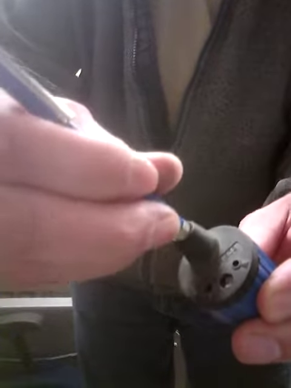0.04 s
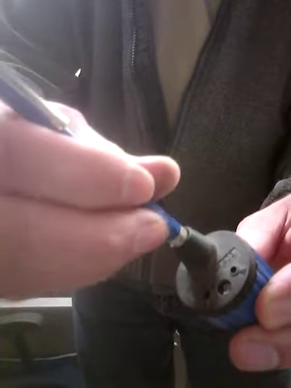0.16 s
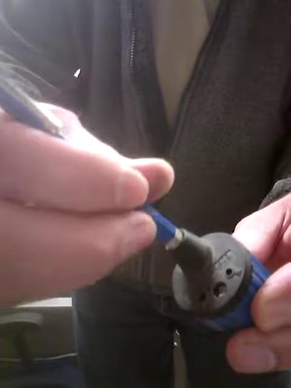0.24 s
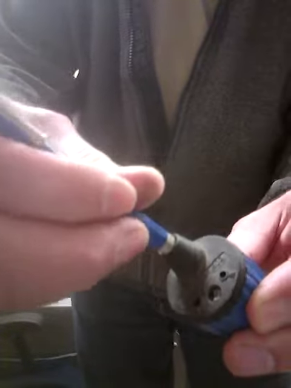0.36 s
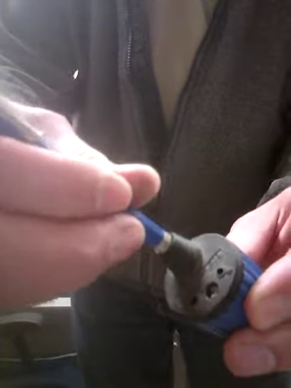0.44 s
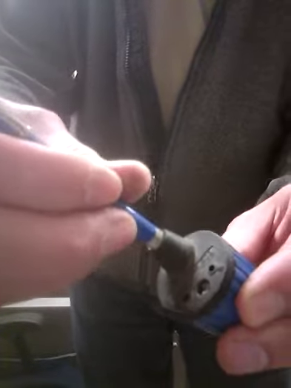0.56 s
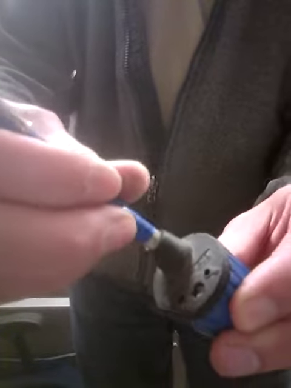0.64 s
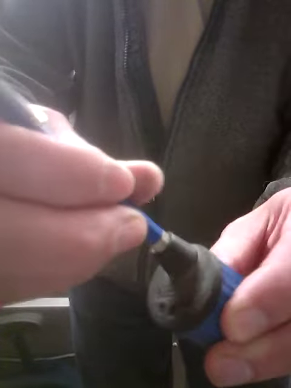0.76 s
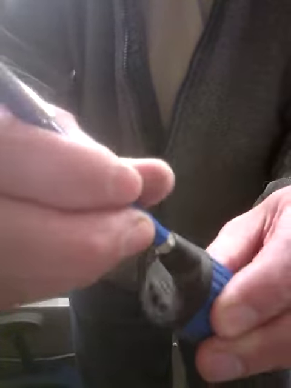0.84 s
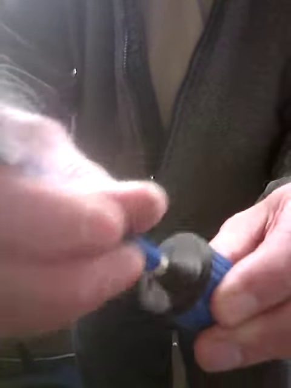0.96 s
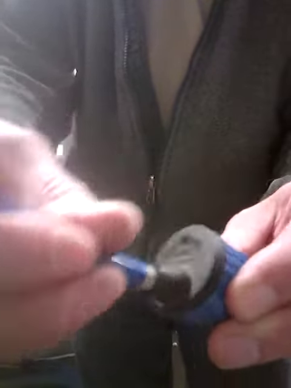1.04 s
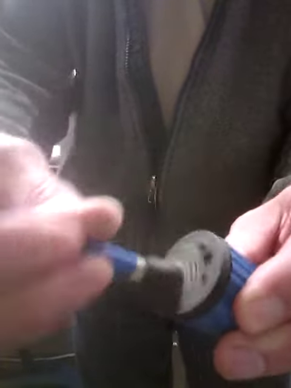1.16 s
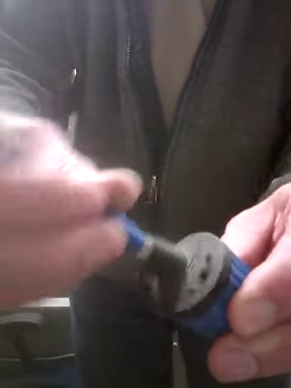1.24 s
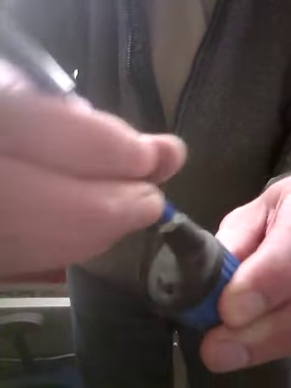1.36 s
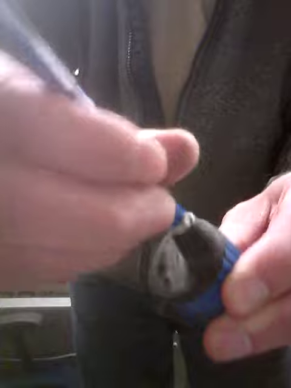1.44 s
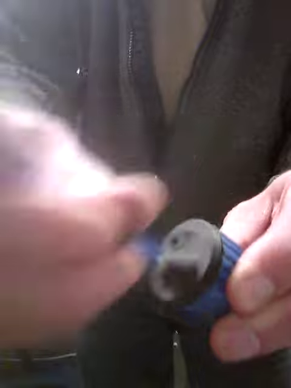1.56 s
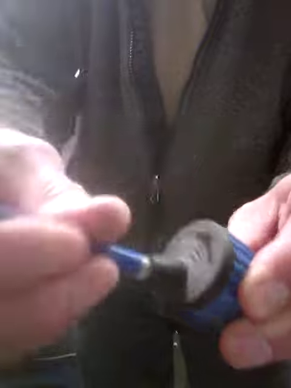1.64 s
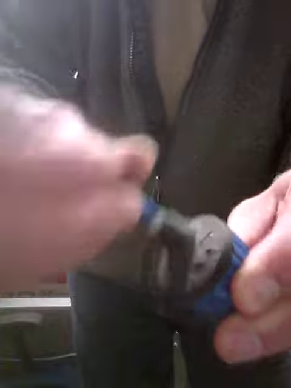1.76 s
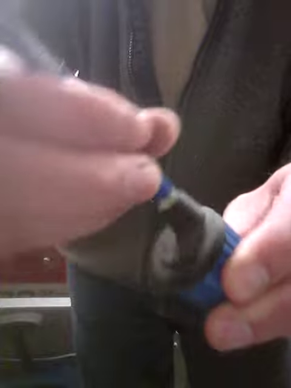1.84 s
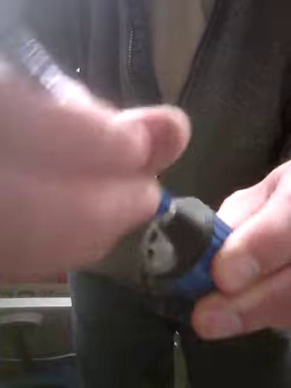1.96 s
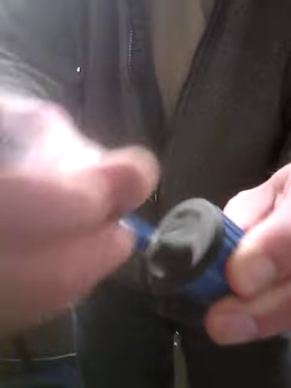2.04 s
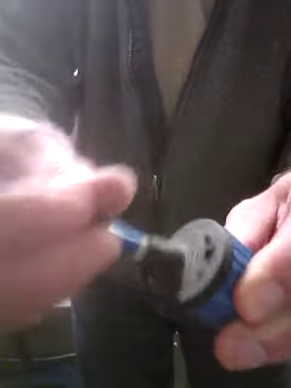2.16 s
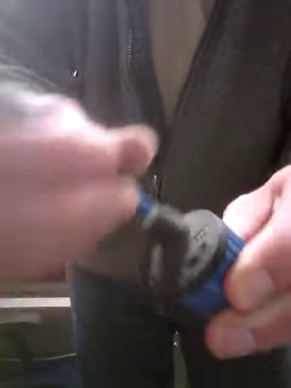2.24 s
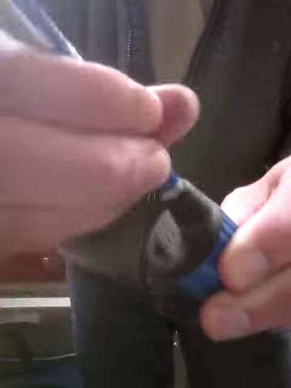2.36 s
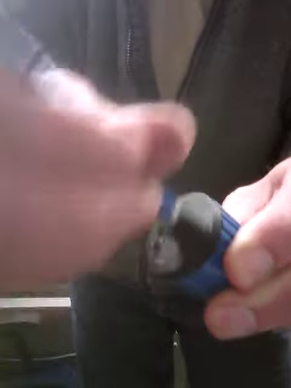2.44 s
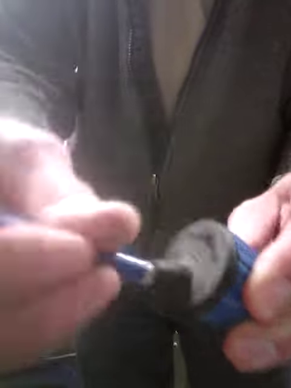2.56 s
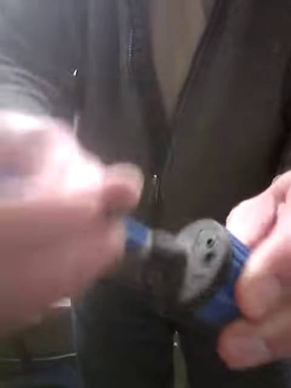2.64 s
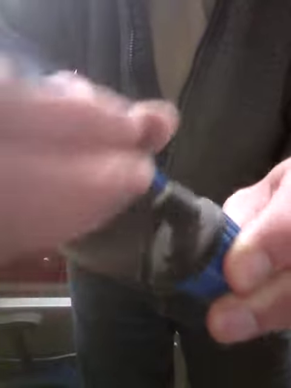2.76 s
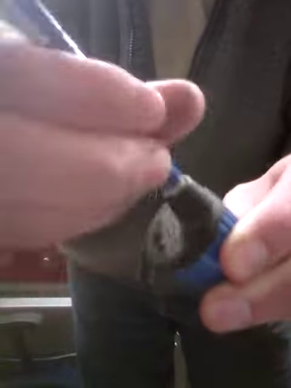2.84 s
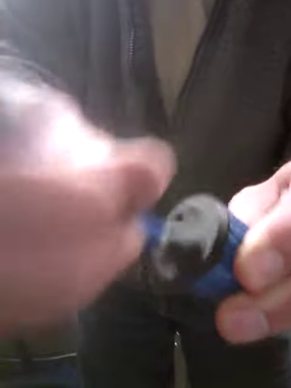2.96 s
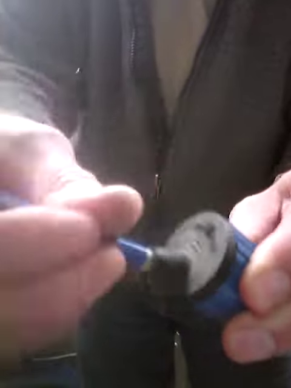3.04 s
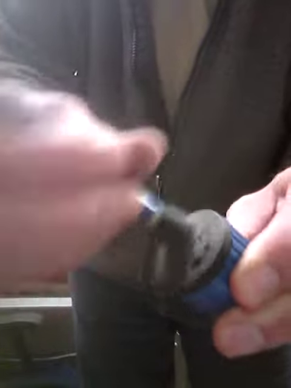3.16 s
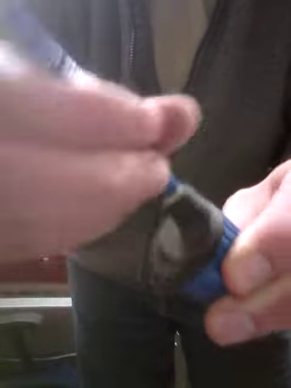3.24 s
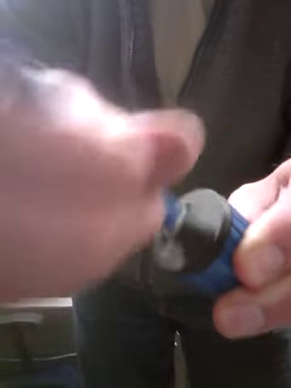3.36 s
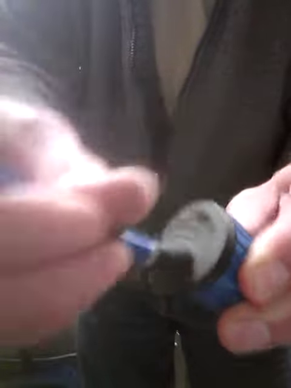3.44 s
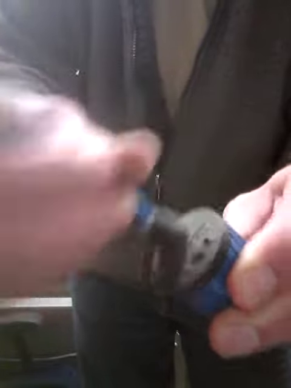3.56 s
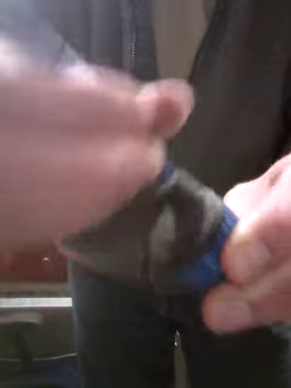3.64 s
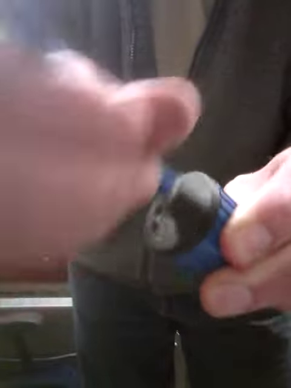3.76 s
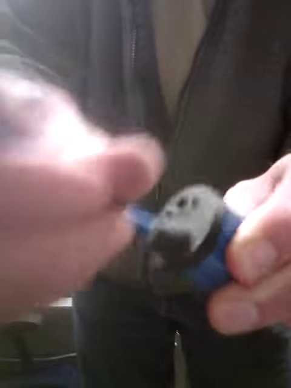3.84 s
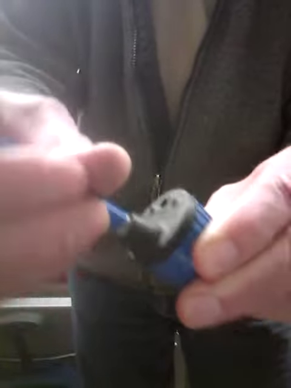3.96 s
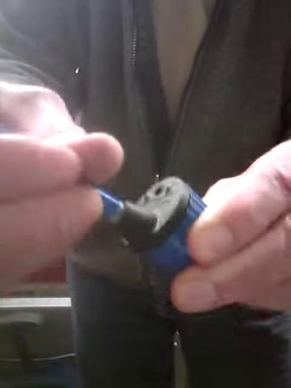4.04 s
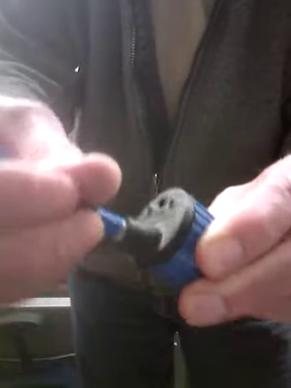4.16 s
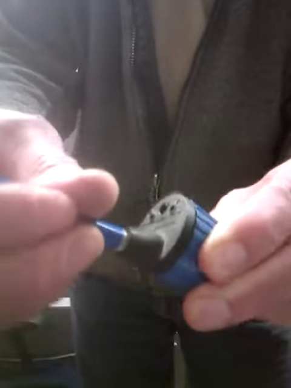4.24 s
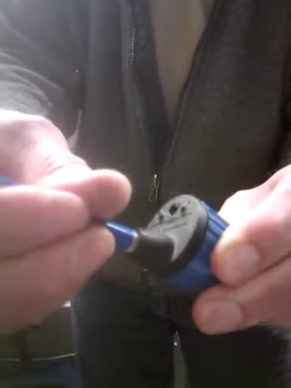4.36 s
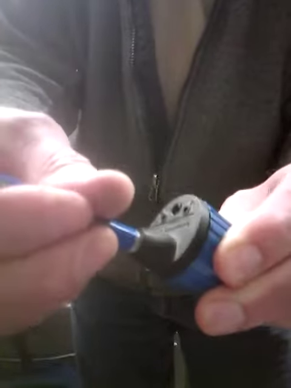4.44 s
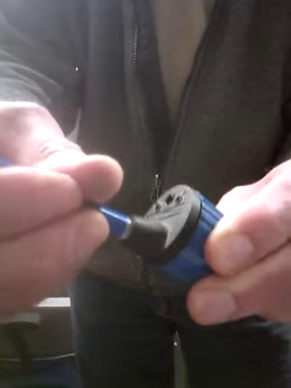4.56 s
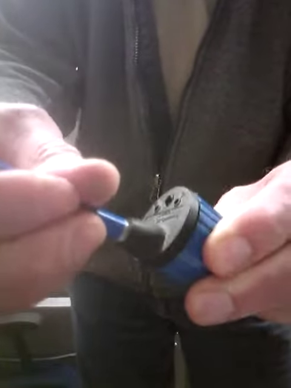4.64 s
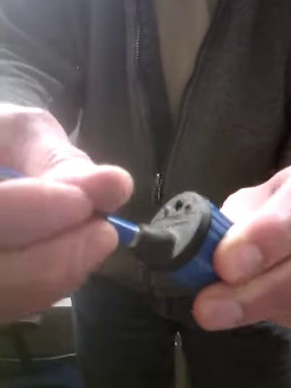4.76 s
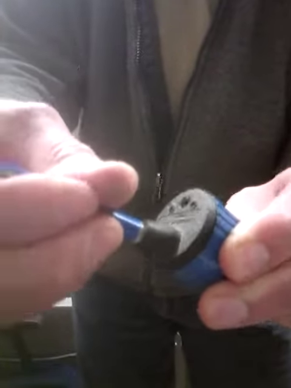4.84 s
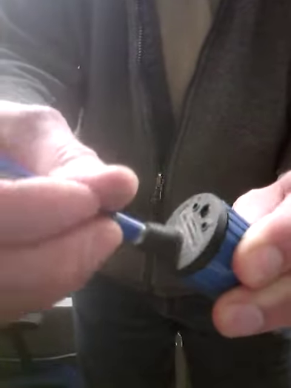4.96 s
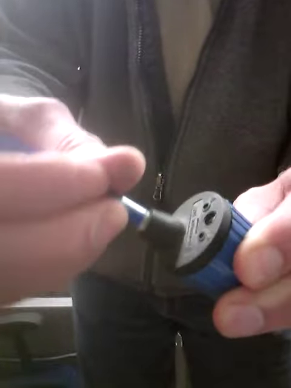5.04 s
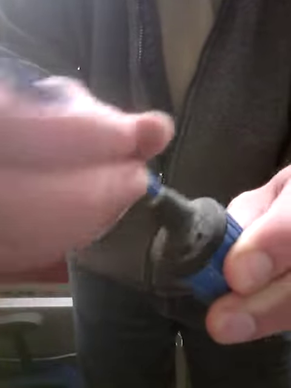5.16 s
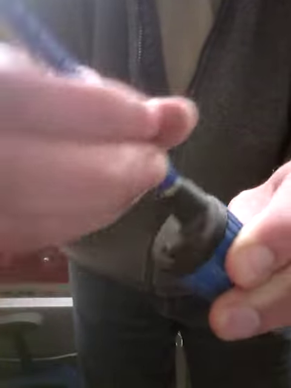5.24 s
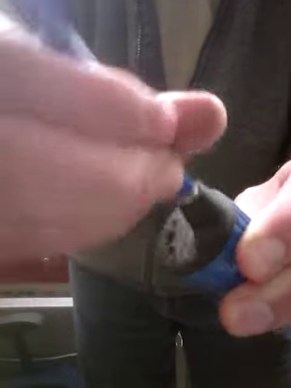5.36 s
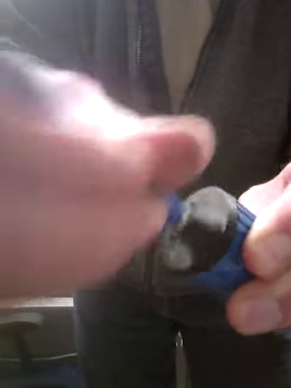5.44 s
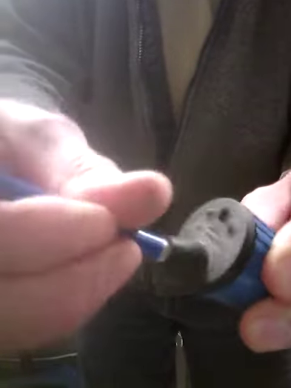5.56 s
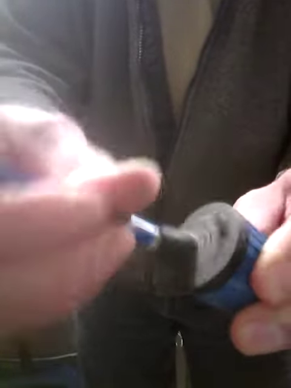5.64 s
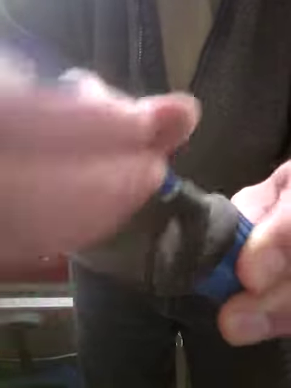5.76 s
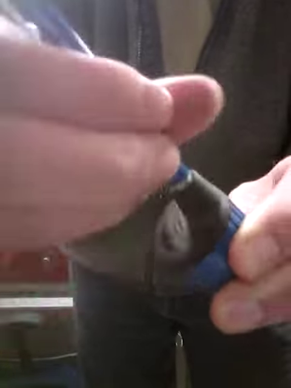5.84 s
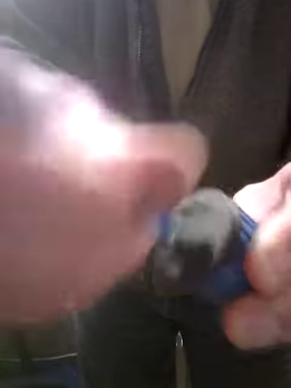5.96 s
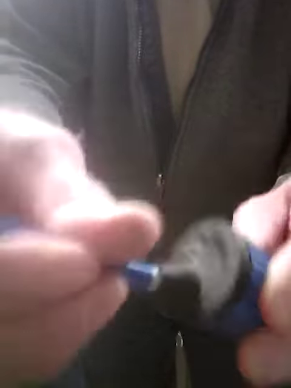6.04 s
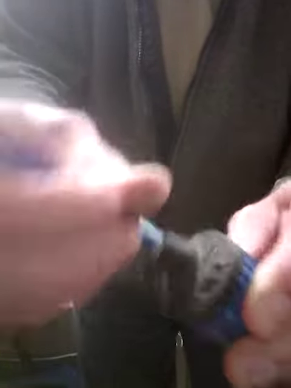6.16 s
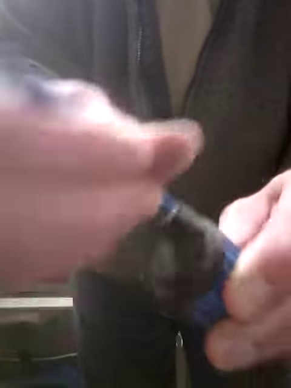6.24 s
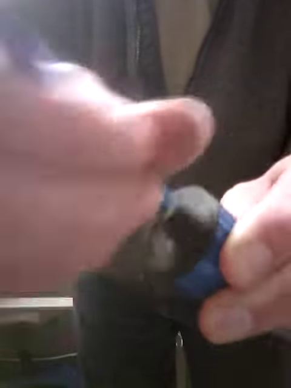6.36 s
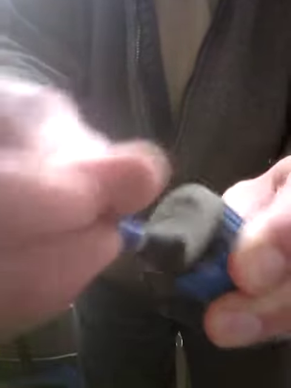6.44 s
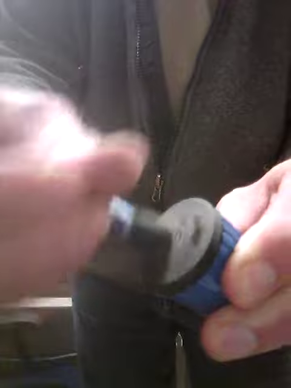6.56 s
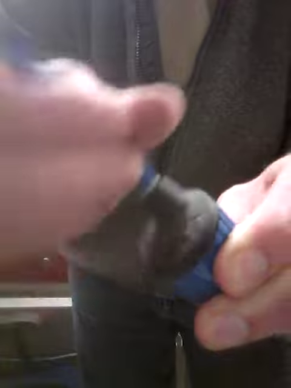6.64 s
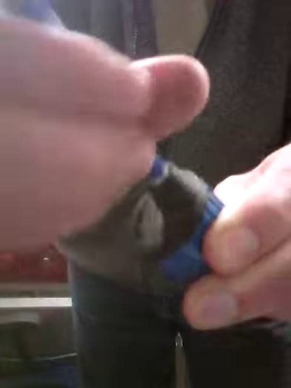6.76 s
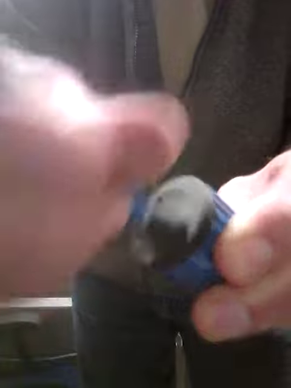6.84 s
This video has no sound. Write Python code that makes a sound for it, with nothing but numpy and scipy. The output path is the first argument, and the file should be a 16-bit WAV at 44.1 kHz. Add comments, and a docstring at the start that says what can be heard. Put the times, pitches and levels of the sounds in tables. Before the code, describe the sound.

A pencil lead is swung round in a plastic rotary pointer, rasping, chattering and half squeaking in two spells, with faint clicks between, in a quiet room

```python
"""In a small, quiet room a lead holder is swung round in a hand-held rotary lead pointer, close by, in two spells.
Stick-slip friction of the lead on the abrasive cup is made of random grains in uneven slips, and a resonant
filter lets the plastic pot ring with them; the cap rumbles. Sliding narrow noise makes half squeaks of the rubbing
parts, and one faint chirping tick in the pause. The holder ticks before, between and once during the spells, as
short bursts of grains. Filtered noise makes room air and a faint whine; sines make a rising hum and a swelling drone."""
import sys
import numpy as np
from scipy import signal
from scipy.fft import rfft, irfft, next_fast_len
from scipy.io import wavfile
from scipy.ndimage import uniform_filter1d, map_coordinates

SR = 44100
rng = np.random.default_rng(int(sys.argv[2]) if len(sys.argv) > 2 else 0)


def transcribe(u):
    """Save the signal u as a 16-bit wav file named by the first command-line argument.

    u: samples, shape (n,) or (channels, n), limited to [-1, 1]; the rate is SR.
    q: integer samples, one column per channel.
    """
    v = np.clip(np.atleast_2d(u).T, -1, 1)
    q = np.round(v * 32767).astype(np.int16)
    wavfile.write(sys.argv[1], SR, q)


N = 304290


def amp(db):
    """Level law: decibels to amplitude gain."""
    return 10 ** (np.asarray(db) / 20)


def unit(x):
    """Normalisation: x scaled to rms 1."""
    return x / np.sqrt(np.mean(x ** 2) + 1e-20)


def along(points, hz):
    """Logarithmic frequency scale: (frequency, value) points interpolated on it."""
    f, v = np.transpose(points)
    return np.interp(np.log(hz + 1), np.log(f + 1), v)


def curves(rows):
    """Linear interpolation in time: one value per sample for each column after the time."""
    s, *cols = np.transpose(rows)
    return [np.interp(np.arange(N) / SR, s, c) for c in cols]


def wobble(rate):
    """Slow random modulation: a smooth curve through rate knots a second."""
    knots = rng.standard_normal(int(N * rate / SR) + 4)
    return map_coordinates(knots, [np.arange(N) * rate / SR])


def gate(start, length, attack_s, release_s):
    """Amplitude envelope: attack, hold and release, from 0 to 1 and back."""
    t = np.arange(N) / SR - start
    return (1 + np.tanh(t / attack_s)) * (1 + np.tanh((length - t) / release_s)) / 4


def filtered(x, response):
    """Linear filtering: the spectrum of x times a response of frequency."""
    m = 2 * next_fast_len(N // 2 + SR // 4)
    return irfft(rfft(x, m) * response(np.fft.rfftfreq(m, 1 / SR)), m)[..., :N]


def causal(db):
    """Minimum phase: folding the cepstrum gives these levels a causal response."""
    cepstrum = irfft(np.log(amp(db)))
    half = len(cepstrum) // 2
    cepstrum[1:half] *= 2
    cepstrum[half + 1:] = 0
    return np.exp(rfft(cepstrum))


# spectrum of the room's air: (frequency [Hz], relative level [dB])
AIR_SPECTRUM = [(15, -62), (25, -35), (48, -22), (92, -1), (123, -7.5), (157, -7), (277, -7.5),
                (301, -14.5), (394, -14), (489, -12), (545, -14.5), (1520, -21.5), (4250, -22), (5280, -30),
                (16000, -46)]
# its left-right correlation: (frequency [Hz], correlation [0-1])
AIR_CORRELATION = [(60, 0.77), (180, 0.44), (550, 0.035), (1650, 0.019)]


def room_air(level_db=-63.5):
    """Diffuse field: mid and side noise mixed so that left and right agree less towards the treble."""
    def mid_and_side(hz):
        angle = np.arccos(along(AIR_CORRELATION, hz)) / 2
        return amp(along(AIR_SPECTRUM, hz)) * [np.cos(angle), np.sin(angle)]
    mid, side = filtered(rng.standard_normal((2, N)), mid_and_side)
    return amp(level_db) * unit(np.array([mid + side, mid - side]))


# bands of a faint, breathy whine: (frequency [Hz], half width [Hz], level [dB])
WHINE_BANDS = [(3160, 90, -79), (3670, 55, -76.5), (4160, 100, -79), (4370, 37, -74.5)]


def whine():
    """Narrow-band noise: each band of noise is heard as a breathy pitch."""
    total = 0
    for centre, width, db in WHINE_BANDS:
        band = filtered(rng.standard_normal((2, N)), lambda hz: 1 / (1 + ((hz - centre) / width) ** 2))
        total = total + amp(db) * unit(band)
    return total


def unsteady_tone(hz, db):
    """Frequency and amplitude modulation: a sine that wavers slightly in pitch and level."""
    phase = 2 * np.pi * np.cumsum(hz * (1 + 0.006 * wobble(8))) / SR
    return np.sqrt(2) * amp(db + 0.7 * wobble(3.6)) * np.sin(phase)


# swells of the higher drone: (start [s], length [s], level [dB])
DRONE_SWELLS = [(-0.1, 0.44, -73.5), (2.682, 0.32, -63.5), (3.096, 1.12, -69.5)]
DRONE_REST_DB, DRONE_FADE_S = -89, 0.12  # level between swells; their rise and fall


def drone(hz=164.5):
    """Amplitude modulation: a tone of steady mean pitch swells now and then."""
    gain = amp(DRONE_REST_DB)
    for start, length, db in DRONE_SWELLS:
        gain = gain + amp(db) * gate(start, length, DRONE_FADE_S, DRONE_FADE_S)
    return unsteady_tone(hz, 20 * np.log10(gain))


# course of the low hum: (time [s], level [dB])
HUM_LEVEL = [(0, -88), (0.35, -71), (0.75, -59), (1.2, -59), (1.5, -64.5), (2.18, -65), (2.28, -56.5),
             (2.45, -64.5), (3.1, -67), (3.9, -80), (6.9, -95)]
HUM_HZ, HUM_RISE_HZ_PER_S = 92.7, 1.9


def hum():
    """Frequency glide: a low tone whose mean pitch rises steadily."""
    return unsteady_tone(HUM_HZ + HUM_RISE_HZ_PER_S * np.arange(N) / SR, curves(HUM_LEVEL)[0])


def grit(spread_db):
    """Granular excitation: abrasive grains of very unequal size, in three unrelated impulse streams."""
    return unit(rng.standard_normal((3, N)) * amp(spread_db * rng.standard_normal(N)))


def hump(t, length_s):
    """Stick-slip release: the power of one slip round its peak, a crush with a brief crack as the lead lets go."""
    # length_s is the width of the crush at half its power
    crush = 2 ** -((t / (length_s * np.where(t < 0, 0.4, 0.6))) ** 2)
    return crush * (1 + 0.41 * 2 ** -((t / 0.00043) ** 2))


# the pot's broad response: (frequency [Hz], relative level [dB])
POT_RESPONSE = [(60, -37), (300, -30), (570, -31.5), (800, -26), (1300, -18), (2300, -9.5), (3000, -6),
                (3800, 1), (4700, -8.5), (5400, -11.5), (6700, -26), (10200, -40), (15500, -35)]
# its resonances: (frequency [Hz], width [Hz], lift [dB])
POT_MODES = [(810, 273, 12), (1172, 68, 6.5), (1730, 800, 7), (4450, 470, 5), (5940, 730, 9),
             (7900, 800, 9.5), (11870, 1600, 8.5), (14850, 880, 11.5)]
# level difference between the sides: (frequency [Hz], left minus right [dB])
SIDE_BALANCE = [(300, 2.5), (800, -1), (1400, -1.5), (1700, -2.5), (1950, -4.5), (2300, 1), (2900, 3),
                (3700, -2.5), (4500, 5), (4900, 3.5), (5600, 6), (6600, -1), (8000, 0.5), (15000, 2)]
# sound that arrives directly: (frequency [Hz], share of power [0-1])
DIRECT_SHARE = [(200, 0.82), (550, 0.36), (800, 0.61), (1500, 0), (2200, 0.93), (3200, 0.07), (4500, 0.96),
                (5600, 0.43), (8000, 0.02), (15000, 0)]


def pot(force, lag_s=0.00013):
    """Modal resonance: the pot rings; direct sound reaches the left first, the hands scatter the rest."""
    sides = np.array([[.5], [-.5]])

    def body(hz):
        lifts = sum(db / (1 + (2 * (hz - centre) / width) ** 2) for centre, width, db in POT_MODES)
        return causal(along(POT_RESPONSE, hz) + lifts) * amp(sides * along(SIDE_BALANCE, hz))

    def straight(hz):
        return np.sqrt(along(DIRECT_SHARE, hz)) * np.exp(2j * np.pi * hz * lag_s * sides)

    direct = filtered(force[0], straight)
    scattered = filtered(force[1:], lambda hz: np.sqrt(1 - along(DIRECT_SHARE, hz)))
    return filtered(direct + scattered, body)


# the cup's three ring bands, above the hollow shell: (upper edge [Hz], relative level [dB])
RING_BANDS = [(4100, -3.5), (5000, 5.5), (6500, -9.5)]


def registers(x, tilt_db, shell_hz=3000):
    """Band splitting: hollow shell, ring of the cup and fine sizzle, each brought to about rms 1."""
    corners = [shell_hz] + [edge for edge, _ in RING_BANDS]
    lows = [filtered(x, lambda hz: 1 / (1 + (hz / corner) ** 24)) for corner in corners]
    # where the lead touches the cup tilts its ring towards the lower or the upper band
    gains = [amp(db + (k - 1) * tilt_db) for k, (_, db) in enumerate(RING_BANDS)]
    ring = sum(gain * unit(band) for gain, band in zip(gains, np.diff(lows, axis=0)))
    return unit(lows[0]), ring / np.linalg.norm(gains, axis=0), unit(x - lows[-1])


# each spell starts slowly and so duller:
# (start [s], sizzle of an ordinary stroke at full speed [dB], sizzle missing at first [dB])
SPELL_STARTS = [(0.7, -49.5, 7), (4.85, -52, 4)]
SPIN_UP_S = 0.65  # time constant of the hand getting up to speed
ORDINARY_DB, SIZZLE_FOLLOWS = -33, 0.6  # ring at an ordinary stroke; dB of sizzle per dB of ring
GRAZE_DB = -39  # ring level below which the lead only grazes and the sizzle fades with it


def sizzle_level(ring_db):
    """Friction noise law: sizzle grows with pressure and hand speed, and ends with the contact."""
    t = np.arange(N) / SR
    spell = np.maximum(np.searchsorted([row[0] for row in SPELL_STARTS], t) - 1, 0)
    start, full_db, missing_db = np.array(SPELL_STARTS)[spell].T
    speed_db = full_db - missing_db * np.exp(-((t - start) / SPIN_UP_S) ** 2)
    pressed_db = np.maximum(ring_db, GRAZE_DB)
    return speed_db + SIZZLE_FOLLOWS * (pressed_db - ORDINARY_DB) + ring_db - pressed_db


def knocks(table, level_db, shell_db, sizzle_db, tilt_db):
    """Impact excitation: each contact is a short crush of grains that rings the pot."""
    ring_power, shell_power = np.zeros((2, N))
    for s, db, hollow_db, length_s in table:
        near = np.arange(max(0, round(s * SR) - SR // 40), min(N, round(s * SR) + SR // 40))
        power = amp(db + level_db) ** 2 * hump(near / SR - s, length_s)
        ring_power[near] += power
        shell_power[near] += power * amp(hollow_db + shell_db) ** 2
    shell, ring, sizzle = registers(pot(grit(spread_db=2.5)), tilt_db)
    ring_db = 10 * np.log10(ring_power + 1e-14)
    sizzle_gain = amp(sizzle_level(ring_db) + sizzle_db)
    return shell * np.sqrt(shell_power) + ring * amp(ring_db) + sizzle * sizzle_gain


# the holder lightly touches its socket before, between and once during the spells, levels before trims:
# (peak time [s], ring level [dB], hollow shell relative to ring [dB], length [s])
SOCKET_TICKS = [(0.256, -59, -7, 0.0054), (0.674, -58, 0, 0.0076), (3.856, -47, 2, 0.0035),
                (3.885, -45.5, -11, 0.0046), (3.916, -60, -13, 0.011), (4.055, -48, 1, 0.0014),
                (4.073, -60, 1, 0.0027), (4.254, -57, -7, 0.003), (4.705, -61, 6, 0.0018),
                (4.992, -51.5, 1, 0.017)]
TICK_TOP_HZ = 5250  # such soft touches ring little higher


def ticks():
    """Soft impact: a gentle contact excites only the lower modes, hence the low-pass."""
    touches = knocks(SOCKET_TICKS, level_db=4.0, shell_db=-7.5, sizzle_db=-4, tilt_db=0)
    return filtered(touches, lambda hz: 1 / (1 + (hz / TICK_TOP_HZ) ** 10))


# reverberation time of the room: (frequency [Hz], time to fall 60 dB [s])
ROOM_DECAY = [(200, 0.32), (2000, 0.36), (5000, 0.042), (14000, 0.23)]


def room(x):
    """Reverberation: convolution with decaying noise gives a small room's short, diffuse answer."""
    hz, t, z = signal.stft(rng.standard_normal((2, SR // 3)), SR, nperseg=256)
    decay = amp(-60 * t / along(ROOM_DECAY, hz)[:, None])
    tail = signal.istft(z * decay, SR, nperseg=256)[1]
    tail = np.pad(tail / np.linalg.norm(tail[0]), ((0, 0), (SR // 200, 0)))  # arrives 5 ms late
    return signal.fftconvolve(x, tail, axes=1)[:, :N]


# the lead rides lightly round the cup while the holder is swung:
# (start [s], end [s], ring level [dB], share in separate slips [0-1])
LIGHT_CONTACT = [(0.727, 1.1, -43, 0.88), (1.06, 1.117, -50, 0.82), (1.126, 3.845, -42, 0.8),
                 (4.988, 5.098, -51, 0.8), (5.092, 7.2, -42.5, 0.78)]
LIGHT_SHELL_DB, LIGHT_TILT_DB = -5, 1  # its hollow shell relative to ring; its tilt per ring band
# the hand bears down: (start [s], length [s], ring level [dB], hollow shell relative to ring [dB],
# upward tilt [dB per ring band], share in separate slips [0-1])
PRESSED_STROKES = [(0.88, 0.038, -45, -2, -4, 0.9), (1.012, 0.047, -36.5, -8, -10, 0.7),
                   (1.19, 0.095, -37.5, -9, -15, 0.93), (1.29, 0.094, -34.5, -8, 7, 0.95),
                   (1.52, 0.13, -34.5, -9, 3, 0.8), (1.69, 0.04, -33.5, -6.5, -11, 0.8),
                   (1.735, 0.028, -28, -10, -14, 0.8), (1.843, 0.043, -33, -10, -5, 0.88),
                   (1.995, 0.077, -30.5, -9, 0, 0.72), (2.135, 0.043, -31, -12.5, -4.5, 0.7),
                   (2.25, 0.072, -31.5, -8, -6, 0.85), (2.375, 0.099, -35, -6.5, -0.5, 0.72),
                   (2.485, 0.046, -33.5, -6.5, -5, 0.68), (2.59, 0.081, -36, -6, -3, 0.82),
                   (2.755, 0.05, -33.5, -10.5, 5.5, 0.7), (2.885, 0.093, -36.5, -7.5, 3.5, 0.78),
                   (2.99, 0.072, -29.5, -12.5, 3.5, 0.68), (3.118, 0.034, -30, -6, -5.5, 0.62),
                   (3.2, 0.069, -29, -11.5, 0, 0.65), (3.34, 0.084, -36, -10, -5, 0.75),
                   (3.436, 0.073, -32, -12.5, 2.5, 0.75), (3.534, 0.16, -31.5, -10.5, -2, 0.66),
                   (3.775, 0.061, -35, -10.5, 0.5, 0.74), (4.868, 0.035, -37.5, -7, 5, 0.55),
                   (5.09, 0.06, -35.5, -9.5, 0.5, 0.8), (5.238, 0.043, -32, -9.5, -4, 0.79),
                   (5.42, 0.044, -37, -17, -6, 0.7), (5.522, 0.042, -33.5, -10, -4, 0.78),
                   (5.65, 0.063, -29.5, -10.5, -1, 0.8), (5.775, 0.1, -31, -12, 1, 0.8),
                   (5.925, 0.064, -35, -8, -7.5, 0.7), (6.068, 0.049, -31.5, -13.5, -8, 0.72),
                   (6.187, 0.042, -30, -14, -11, 0.8), (6.235, 0.1, -36.5, -13, -1.5, 0.87),
                   (6.362, 0.046, -28, -11.5, -5, 0.76), (6.43, 0.069, -32.5, -9.5, -4, 0.72),
                   (6.556, 0.06, -28.5, -12, 1.5, 0.62), (6.67, 0.11, -33.5, -11, 0, 0.7),
                   (6.812, 0.04, -39, -8, 7, 0.5), (6.856, 0.074, -30.5, -12, 2, 0.6)]
ATTACK_S, RELEASE_S = 0.013, 0.016  # how fast pressure comes and goes


def hand():
    """Power summation: light contact and strokes add to the ring's level; the harder sets the colour more."""
    light = [(start, end - start, db, LIGHT_SHELL_DB, LIGHT_TILT_DB, chatter)
             for start, end, db, chatter in LIGHT_CONTACT]
    rows = np.array(light + list(PRESSED_STROKES))
    powers = np.array([amp(db) ** 2 * gate(start, length, ATTACK_S, RELEASE_S)
                       for start, length, db in rows[:, :3]])
    total = powers.sum(axis=0) + 1e-10
    hollow, tilt, chatter = rows[:, 3:].T @ powers / total
    return 10 * np.log10(total), hollow, tilt, chatter


def rumble(ring_db, level_db=-47.5, follow=0.46, low_hz=60, high_hz=260, side_db=-8):
    """Rolling noise: the turning cap rumbles softly in the hand, more under a firmer stroke."""
    def band(hz):
        high_pass = (hz / low_hz) ** 6 / (1 + (hz / low_hz) ** 6)
        return high_pass / (1 + (hz / high_hz) ** 2)
    mid, side = filtered(rng.standard_normal((2, N)), band) * amp([[0], [side_db]])
    effort_db = uniform_filter1d(ring_db, size=SR // 12)
    return amp(level_db + follow * effort_db) * unit(np.array([mid + side, mid - side]))


def patchy(x, depth_db):
    """Spectral modulation: the colour drifts at random as the contact moves round the cup."""
    z = signal.stft(x, nperseg=512)[2]
    field = rng.standard_normal(z.shape[-2:])
    for _ in range(2):
        field = uniform_filter1d(field, size=5, axis=0)  # smooth over frequency
        field = uniform_filter1d(field, size=9, axis=1)  # smooth over time
    return signal.istft(z * amp(depth_db * unit(field)), nperseg=512)[1][..., :N]


def slips(share, slow_hz=72, fast_hz=150, length_s=0.0063, spread_db=1.45):
    """Stick-slip friction: a power envelope of mean about 1, slower the harder the lead sticks."""
    pace = (fast_hz + (slow_hz - fast_hz) * share ** 2) * np.exp(.22 * wobble(60))
    starts = np.diff(np.floor(np.cumsum(pace) / SR), prepend=0)
    kicks = starts * amp(spread_db * rng.standard_normal(N)) ** 2
    one_slip = hump(np.arange(-SR // 50, SR // 50) / SR, length_s)
    power = np.abs(signal.fftconvolve(kicks, one_slip, "same"))
    # the hand feeds the lead steadily, so big slips are paid for by small ones
    return power / (uniform_filter1d(power, size=SR // 22) + 1e-3 * power.mean())


# the lead judders at an even pace, levels before scatter and trims:
# (first slip [s], last slip [s], number of slips, ring level [dB], hollow shell relative to ring [dB])
JUDDER_RUNS = [(0.782, 0.881, 7, -37, -2.5), (1.197, 1.227, 3, -28, -6), (1.255, 1.281, 3, -26.5, -7),
               (1.301, 1.308, 2, -26.5, -2), (1.323, 1.344, 2, -27, -7), (1.349, 1.392, 4, -29, -4),
               (1.409, 1.477, 5, -34.5, -1.5), (1.498, 1.517, 2, -35.5, 3.5), (1.74, 1.745, 2, -22.5, -8),
               (1.772, 1.785, 2, -25, -9), (2.194, 2.254, 5, -28, -7.5), (2.722, 2.76, 3, -25.5, -8.5),
               (4.86, 4.882, 2, -31.5, -6), (5.183, 5.218, 3, -27.5, -7.5), (5.758, 5.775, 2, -25, -9.5),
               (5.823, 5.85, 3, -30, -5), (6.142, 6.181, 3, -26.5, -13), (6.537, 6.544, 2, -25.5, -10)]
JUDDER_SLIP_S = 0.0049  # length of each slip in a judder
# the lead catches once and breaks free, levels before trims:
# (peak time [s], ring level [dB], hollow shell relative to ring [dB], length [s])
SINGLE_CATCHES = [(0.716, -43.5, -4, 0.0061), (0.741, -33, -2.5, 0.0073), (0.757, -32.5, 0, 0.0036),
                  (0.895, -28.5, -8, .004), (0.934, -29.5, -5.5, 0.0057), (1.048, -33.5, 0.5, 0.0044),
                  (1.271, -21, -8, 0.0013), (1.336, -24.5, -7, 0.0024), (1.556, -39, -10, .001),
                  (1.716, -27, -12, .003), (1.758, -21, -6, 0.00094), (1.806, -26.5, -9, .005),
                  (1.821, -20, -8.5, 0.0021), (2.061, -32, -12, 0.0031), (2.145, -28, -14, 0.0027),
                  (2.264, -18.5, -13.5, 0.0019), (2.274, -32, -8, .002), (2.442, -24, -12, .004),
                  (2.682, -24, -8, 0.0053), (2.689, -27.5, -2.5, .005), (3.033, -26.5, -6, 0.0022),
                  (3.04, -22.5, -19, .002), (3.169, -29, -2, 0.0061), (3.179, -28, -3.5, 0.0029),
                  (3.208, -25, -1, 0.0035), (3.452, -25.5, -15, 0.0033), (3.546, -30, 0.5, 0.0065),
                  (3.627, -26, -5.5, 0.0052), (3.837, -29, -5.5, .005), (5.021, -24, -9.5, 0.0051),
                  (5.095, -27, -4, .005), (5.157, -30, -3.5, 0.0029), (5.575, -39, 4.5, .002),
                  (5.624, -34.5, 1, 0.0043), (5.642, -26, -10, .004), (5.734, -27.5, -5.5, 0.0079),
                  (5.745, -37, -4, 0.0034), (5.973, -26.5, -6, 0.0042), (6.115, -28, -9, .0025),
                  (6.196, -23, -6.5, 0.0026), (6.464, -27, -16, .002), (6.485, -30, -8, 0.0067),
                  (6.522, -27, -12, 0.0038), (6.573, -25, -8, .003), (6.634, -25, -8.5, 0.0049),
                  (6.652, -28, -13, 0.0047), (6.693, -26, -7, 0.0029), (6.856, -22, -7, 0.0012)]


def hard_slips(scatter_db=2.0):
    """Stick-slip at high load: judders and single catches as rows like SINGLE_CATCHES, in order of time."""
    rows = [tuple(row) for row in SINGLE_CATCHES]
    for first, last, count, db, hollow in JUDDER_RUNS:
        for s in np.linspace(first, last, int(round(count))):
            rows.append((s, db + scatter_db * rng.standard_normal(), hollow, JUDDER_SLIP_S))
    return np.array(sorted(rows))


def sticking(catches, reach=1.18, early_s=0.0012):
    """Static friction: the lead is held round each hard slip, and scraping dips for reach times its length."""
    t = np.arange(N) / SR
    held = catches[:, 0] - early_s
    nearest = np.searchsorted((held[1:] + held[:-1]) / 2, t)
    return 1 - .82 * np.exp(-((t - held[nearest]) / (reach * catches[nearest, 3])) ** 4)


# the lead jams: (start [s], length [s])
JAMS = [(0.765, 0.012), (0.867, 0.009), (1.068, 0.037), (1.245, 0.01), (1.284, 0.012), (1.467, 0.0075),
        (1.489, 0.011), (1.5, 0.012), (1.727, 0.0093), (1.788, 0.011), (2.695, 0.014), (3.154, 0.0073),
        (4.801, 0.046), (5.165, 0.011), (5.719, 0.013), (6.147, 0.012), (6.614, 0.012)]
STALL_DB, STALL_EDGE_S = -10, 0.002  # how far and how fast the scraping drops


def stalling():
    """Interrupted sliding: the gain of the scraping drops while the lead is jammed."""
    return amp(STALL_DB * sum(gate(start, length, STALL_EDGE_S, STALL_EDGE_S) for start, length in JAMS))


def grinding(level, hollow, tilt, chatter, catches):
    """Sliding friction: smooth scraping and chatter, swelling with each stroke of the hand."""
    share = np.clip(chatter, 0, .93)
    power = 1 - share + share * slips(share)
    force = patchy(grit(spread_db=6.0), depth_db=2.5) * np.sqrt(power)
    shell, ring, sizzle = registers(pot(force), tilt)
    scrape = amp(level) * (amp(hollow) * shell + ring) + amp(sizzle_level(level)) * sizzle
    return stalling() * sticking(catches) * scrape


# half squeaks of the rubbing parts, and one faint chirping tick in the pause:
# (start [s], length [s], first frequency [Hz], last frequency [Hz], level [dB])
SQUEAK_AND_CHIRP_GLIDES = [(0.883, 0.043, 5250, 4820, -42), (1.855, 0.035, 4300, 4500, -43),
                           (2.028, 0.055, 4943, 4620, -40.5), (3.005, 0.048, 5500, 5565, -39),
                           (3.45, 0.042, 4150, 4250, -36), (3.789, 0.07, 4487, 4363, -40),
                           (4.249, 0.014, 3450, 3250, -59), (6.075, 0.055, 4050, 4430, -32),
                           (6.179, 0.051, 4200, 3846, -36), (6.677, 0.11, 4600, 3920, -37),
                           (6.809, 0.035, 2550, 2900, -37.5)]
GLIDE_HALF_WIDTH_HZ, GLIDE_FADE_S = 320, 0.006


def squeaks_and_chirp(chatter=0.57, left_db=1.0):
    """Frequency-shifted narrow-band noise: it slides in pitch, flutters at a slip pace and is diffuse."""
    noise = rng.standard_normal((2, 2, N))
    a, b = unit(filtered(noise, lambda hz: 1 / (1 + (hz / GLIDE_HALF_WIDTH_HZ) ** 2)))
    points, level = [], 0
    for s, length, first, last, db in SQUEAK_AND_CHIRP_GLIDES:
        points += [(s, first), (s + length, last)]
        level = level + amp(db) * gate(s, length, GLIDE_FADE_S, GLIDE_FADE_S)
    phase = 2 * np.pi * np.cumsum(curves(points)[0]) / SR
    flutter = np.sqrt(1 - chatter + chatter * slips(chatter))
    # the noise is shifted up to the sliding pitch
    return amp([[left_db], [-left_db]]) * level * flutter * (a * np.cos(phase) + b * np.sin(phase))


def scene():
    """Superposition: the pointer close by, the room's answer to it, and the background."""
    background = room_air() + whine() + drone() + hum()
    level, hollow, tilt, chatter = hand()
    catches = hard_slips()
    pointer = ticks() + grinding(level, hollow, tilt, chatter, catches) + squeaks_and_chirp()
    pointer = pointer + knocks(catches, level_db=-2.0, shell_db=-4.5, sizzle_db=1, tilt_db=-5.5)
    return pointer + amp(-10.5) * room(pointer) + rumble(level) + background


TOP_HZ = 15800


def record(dry):
    """Band limiting: nothing is kept above the top frequency."""
    return filtered(dry, lambda hz: hz < TOP_HZ)


dry = scene()
out = record(dry)
transcribe(out)
```